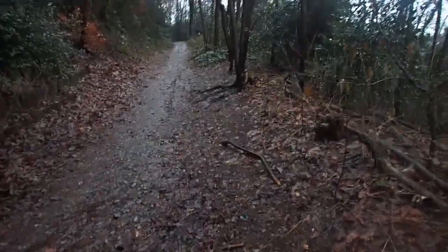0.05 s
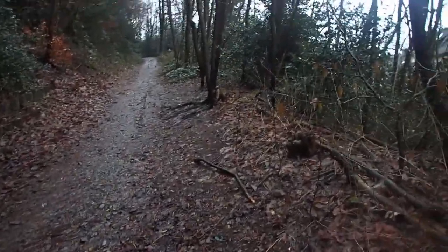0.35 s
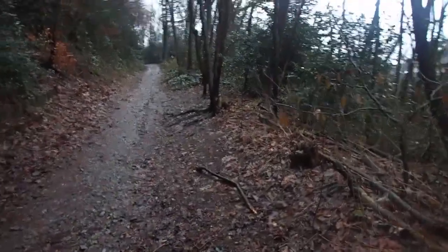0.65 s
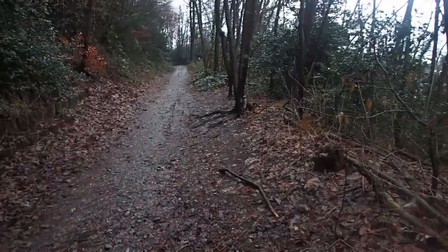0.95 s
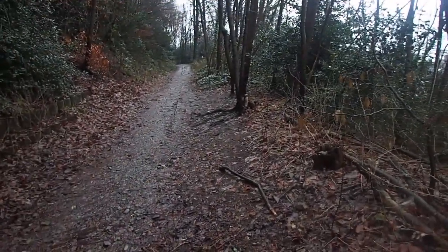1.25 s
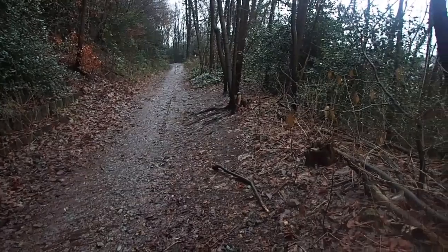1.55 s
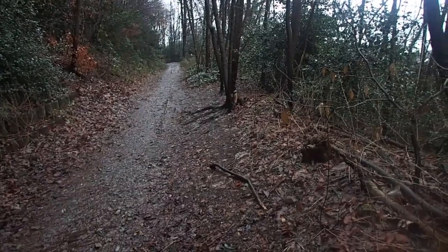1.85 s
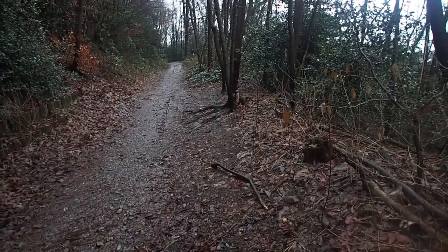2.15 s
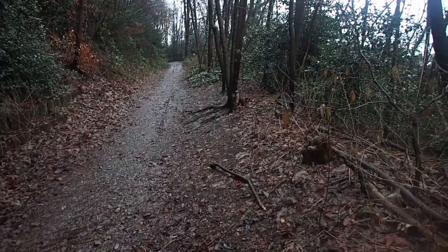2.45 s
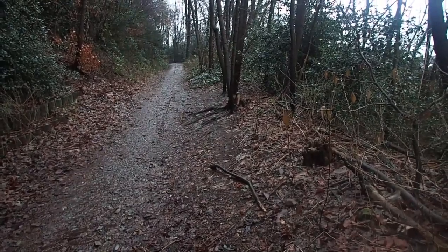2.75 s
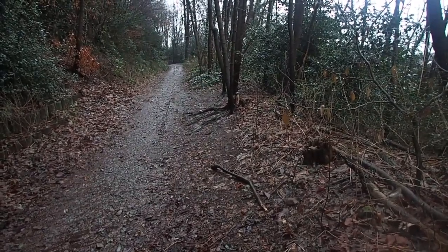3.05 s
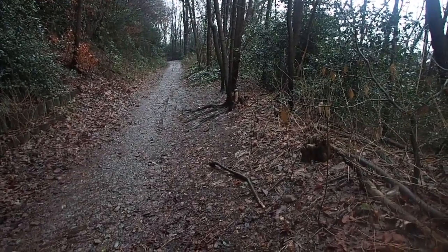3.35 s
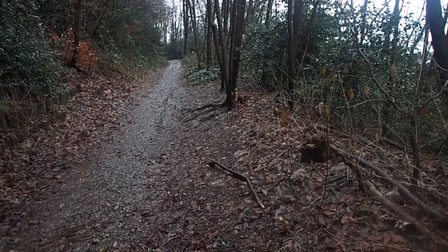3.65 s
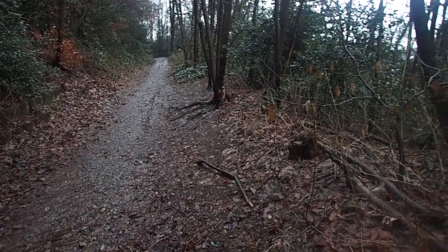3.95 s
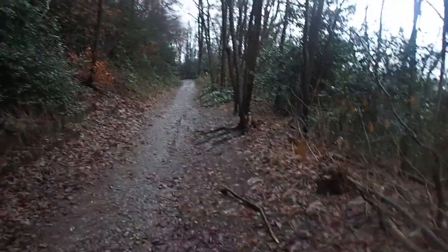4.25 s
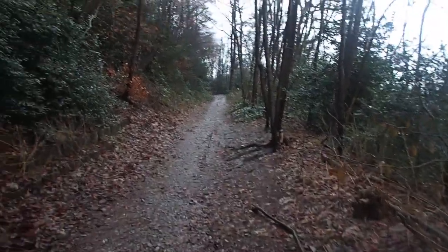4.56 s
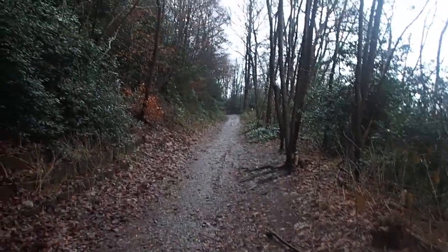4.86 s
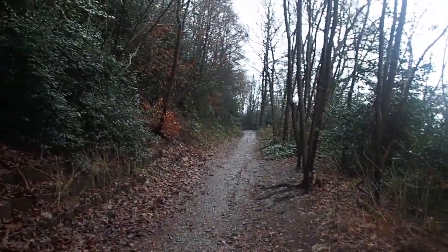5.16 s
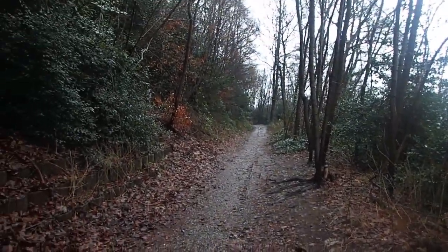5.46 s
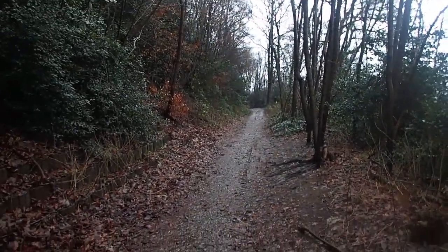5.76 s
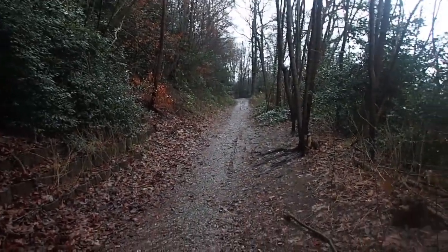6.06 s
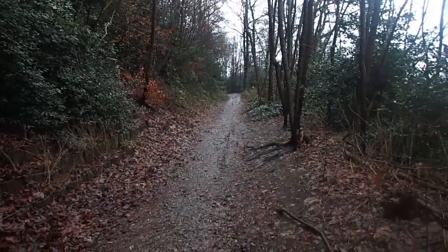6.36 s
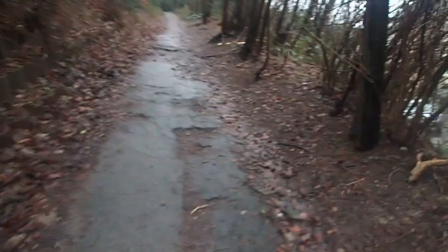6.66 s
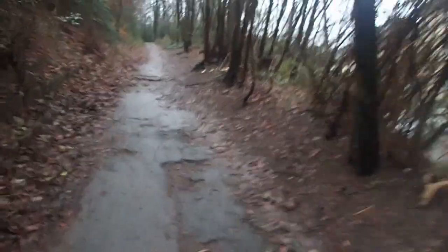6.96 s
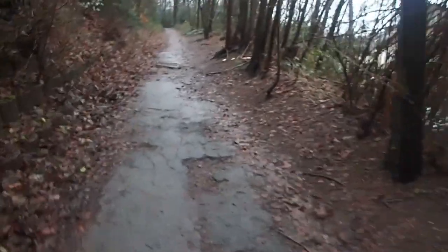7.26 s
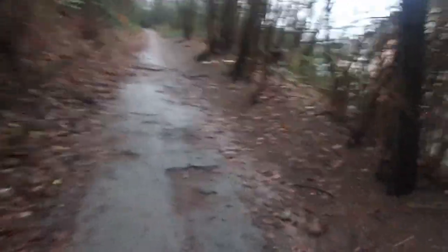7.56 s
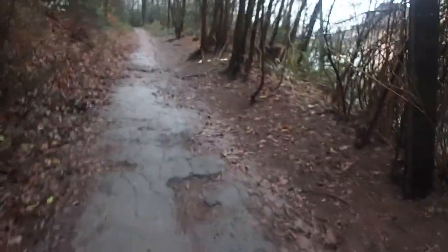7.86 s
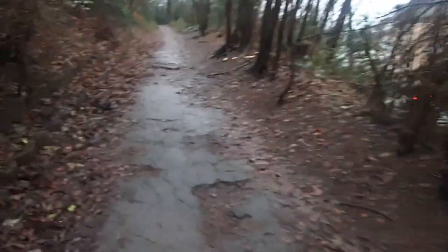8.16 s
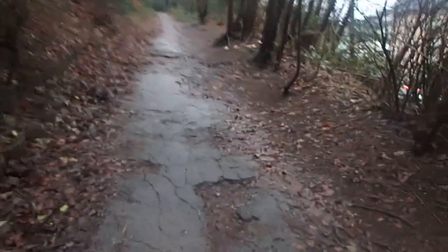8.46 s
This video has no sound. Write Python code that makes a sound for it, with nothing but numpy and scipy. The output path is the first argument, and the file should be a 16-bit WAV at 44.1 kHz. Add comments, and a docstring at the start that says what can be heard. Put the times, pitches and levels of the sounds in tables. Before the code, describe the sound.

Heard through a hand-held phone on a forest path, quiet rain patters on fallen leaves while single close drops land irregularly, one much louder than the rest. Cloth brushes past once. After a short dropout and a thump, a stronger wash of rain takes over, with a faint low hum sinking away, a few swishes of a sleeve and two more drops.

```python
"""Rain in a winter wood, heard through a hand-held phone whose two microphone ports resonate near 6 kHz.
At first fat drops strike nearby leaves and excite their bending modes, over patter, far wash and rumble.
A faint tone swells near 0.45 s, and at 1 s a sleeve brushes past. At 6.6 s the sound cuts out briefly;
it returns with a thump further down the path, where the wash is louder and something hums far off.
The hum sinks away while the sleeve brushes past again and two more fat drops land."""
import sys
import numpy as np
from scipy import signal
from scipy.fft import rfft, irfft, next_fast_len
from scipy.io import wavfile
from scipy.ndimage import uniform_filter1d, map_coordinates

SR = 44100
rng = np.random.default_rng(int(sys.argv[2]) if len(sys.argv) > 2 else 0)


def materialize(psi):
    """Save the field psi as 16-bit PCM at rate SR to the path in sys.argv[1].

    A 1-D psi becomes a single channel; in a 2-D psi each row is a channel.
    """
    bounded = np.clip(np.atleast_2d(psi).T, -1, 1)
    quanta = np.round(bounded * 32767).astype(np.int16)
    wavfile.write(sys.argv[1], SR, quanta)


N = 384552
BREAK_START_S, BREAK_END_S = 6.617, 6.777

# spectral shapes of the noise layers: (frequency [Hz], relative spectral density [dB])
RUMBLE_SPECTRUM = [(20, -32), (50, -9.5), (90, -7), (150, 0.5), (290, -2), (450, -7.5), (900, -7.5),
                   (3000, -52.5)]
FIRST_WASH_SPECTRUM = [(60, -16), (250, -6), (450, 0.5), (700, -3.5), (1050, 3), (1600, 2), (3000, -1.5),
                       (5000, -15.5), (16000, -27)]
SECOND_WASH_SPECTRUM = [(60, -46), (250, -7), (450, -3.5), (700, -2.5), (830, -2.5), (1080, 2.5),
                        (1300, -0.5), (1600, -1), (3000, -6.5), (5000, -21.5), (16000, -24)]
HISS_SPECTRUM = [(300, -59), (2500, -12), (5000, 0.5), (8000, -1), (11000, 1), (16000, -5.5)]
CLOTH_SPECTRUM = [(500, -31), (4500, -13), (6500, -5), (8000, -1.5), (10000, -2.5), (16000, -3.5)]
# likeness of left and right: (frequency [Hz], coherence [0-1])
COHERENCE = [(30, 0.65), (130, 0.98), (600, 0.9), (1400, 0.96), (3100, 1), (6800, 0.74), (10000, 0.4),
             (15000, .05)]
# low rumble of the surroundings: (time [s], level [dB])
RUMBLE_LEVELS = [(0, -58.5), (0.8, -56.5), (1.85, -57), (2.2, -59), (3.9, -61.5), (4.3, -60.5), (6.0, -59),
                 (6.6, -56), (6.8, -55), (8.15, -56.5), (8.7, -49)]
# steady rain before and after the break, ahead of trims: (time [s], wash level [dB], hiss level [dB])
FIRST_RAIN_LEVELS = [(0.0, -55, -50), (0.5, -53.5, -52.5), (0.79, -58, -51.5), (1.07, -58, -50),
                     (1.27, -52, -46), (1.57, -67, -50.5), (1.97, -55.5, -48), (2.45, -57, -52.5),
                     (2.82, -54.5, -49), (3.11, -57.5, -52), (3.33, -54, -49), (3.93, -57, -51.5),
                     (4.31, -53.5, -49), (4.79, -59, -51), (5.2, -54.5, -52), (5.63, -60, -49),
                     (5.95, -58, -53.5), (6.42, -52.5, -49.5)]
SECOND_RAIN_LEVELS = [(7.0, -41, -35.5), (7.212, -40.5, -35), (7.434, -40.5, -34.5), (7.658, -41, -39.5),
                      (7.86, -41.5, -40.5), (8.288, -41, -37.5), (8.7, -40.5, -35)]
# resonances of fallen leaves of different sizes: (frequency [Hz], relative gain [dB])
LITTER_MODES = [(5000, -11), (6200, -6), (7500, -4.5), (9300, 0)]
# strokes of the sleeve past the phone: (start [s], duration [s], level [dB])
SLEEVE_STROKES = [(1.04, 0.4, -41), (6.749, 0.16, -39.5), (7.452, 0.22, -36), (7.789, 0.35, -36),
                  (8.37, 0.38, -33.5)]
# big limp leaves thud, small stiff ones plink: (slap frequency [Hz], quality factor [1])
LEAF_Q = [(250, 1.5), (520, 0.73), (1000, 0.78), (1400, 0.85), (1750, 7.2)]
# the loudest near drops, ahead of trims:
# (time [s], slap level [dB], tick level [dB], slap frequency [Hz], tick frequency [Hz], spray [0-1])
FAT_DROPS = [(0.038, -47.5, -50.5, 1200, 6700, 0.6), (0.109, -55, -58, 380, 6550, .9),
             (0.291, -44, -40.5, 1120, 5330, 0.12), (0.482, -50, -52, 1120, 5700, 0.2),
             (0.508, -46, -55, 1210, 5450, 0), (0.642, -69, -39.5, 1240, 7400, 0.1),
             (0.675, -49.5, -63, 1220, 5900, .3), (1.032, -51.5, -55, 1210, 6400, 0.3),
             (1.179, -52, -52, 1670, 5000, .3), (1.296, -49, -43, 1190, 6470, .14),
             (1.389, -28, -26.5, 566, 6260, 0), (1.475, -43.5, -43.5, 800, 4960, 0.17),
             (1.616, -50.5, -60, 1220, 5900, 0.3), (1.687, -50.5, -52.5, 1290, 4670, 0),
             (1.949, -42.5, -52.5, 960, 6550, 0), (1.971, -57, -35.5, 1120, 10200, .8),
             (2.241, -59, -46.5, 670, 7050, 0.5), (2.532, -57, -51, 1230, 4300, .1),
             (2.738, -47, -54, 970, 5700, 0.2), (2.772, -52.5, -54.5, 1250, 5030, 0),
             (2.975, -45.5, -42.5, 1800, 6050, 0.3), (3.044, -52.5, -58, 1130, 6000, .3),
             (3.19, -47.5, -49, 980, 5260, 0.04), (3.248, -52, -66, 1010, 5270, .5),
             (3.322, -51, -51, 1190, 5430, 0.2), (3.381, -47.5, -54, 1160, 5400, 0),
             (3.423, -49, -56, 1230, 5540, .4), (3.516, -53, -47.5, 915, 6300, 1),
             (3.658, -48, -53, 1040, 5440, 0.1), (3.684, -49.5, -54, 1050, 5600, .4),
             (3.843, -67, -47.5, 880, 6100, .6), (3.915, -45, -44.5, 1350, 5700, 0.08),
             (4.015, -54, -47.5, 1370, 6300, 0), (4.145, -64, -44.5, 1000, 8100, .4),
             (4.278, -72, -44.5, 1140, 7350, 0.5), (4.434, -51, -47.5, 1190, 6500, 0),
             (4.441, -46, -53, 1290, 6100, 0), (4.613, -87, -31, 1300, 7400, 0.08),
             (4.795, -46, -50.5, 1250, 5970, 0.1), (5.033, -53, -50, 1180, 5800, 0),
             (5.15, -49, -47, 1390, 6660, .6), (5.48, -59, -49.5, 960, 6800, .5),
             (5.727, -56, -48, 1560, 6760, .6), (5.756, -56, -50.5, 1410, 6000, 0.2),
             (5.879, -50.5, -47.5, 1040, 6700, .9), (5.896, -46.5, -55, 1060, 5430, 0.4),
             (6.301, -53, -59, 1850, 6200, .2), (6.358, -53, -49.5, 1450, 5200, .2),
             (6.387, -53.5, -47.5, 1070, 4930, 0.2), (6.423, -42.5, -48, 1170, 5900, 0),
             (6.537, -47.5, -53, 1150, 5800, 0.2), (6.55, -50, -53, 1110, 6300, 0.3),
             (6.575, -59, -47, 1270, 5540, .15), (6.99, -55, -33, 1004, 7400, .4),
             (8.41, -49, -60, 220, 5950, .9)]
# response of both microphone ports, and what the right one adds: (frequency [Hz], gain [dB])
PORT_RESPONSE = [(20, 0), (150, -0.5), (1600, 0), (2100, -1.5), (2700, -9.5), (3100, -4.5), (4150, -6.5),
                 (4650, 0.5), (5400, 3), (6300, 7), (7300, 1.5), (8000, 3.5), (9000, -8.5), (11500, -17)]
RIGHT_PORT_EXTRA = [(60, 3.5), (300, 3.5), (3000, 3.5), (3900, 1), (4600, 3.5), (5400, 10), (6400, 0.2),
                    (12000, -1)]
# narrow bands absorbed by cavities in the case: (frequency [Hz], width [Hz], depth [dB])
CAVITY_NOTCHES = [(1880, 114, 13), (3336, 35, 22), (4036, 97, 13), (4860, 134, 12.5)]


def amp(db):
    """Amplitude ratio: a factor of ten for every 20 dB."""
    return 10 ** (np.asarray(db) / 20)


def unit(x):
    """Normalisation to rms 1."""
    return x / np.sqrt(np.mean(x ** 2) + 1e-20)


def along(points, hz):
    """Interpolation of (frequency [Hz], value) points on a logarithmic frequency axis."""
    knots_hz, values = np.transpose(points)
    return np.interp(np.log(hz + 1), np.log(knots_hz + 1), values)


def curves(rows):
    """Linear interpolation, sample by sample, of each column after the time."""
    times, *columns = np.transpose(rows)
    return [np.interp(np.arange(N) / SR, times, column) for column in columns]


def wobble(rate):
    """Random modulation: a spline through `rate` Gaussian knots a second."""
    knots = rng.standard_normal(int(N * rate / SR) + 4)
    return map_coordinates(knots, [np.arange(N) * rate / SR])


def filtered(x, response):
    """Linear filtering: the spectrum is multiplied by a frequency response."""
    size = next_fast_len(N + SR // 4)
    return irfft(rfft(x, size) * response(np.fft.rfftfreq(size, 1 / SR)), size)[..., :N]


def ring(x, hz, q):
    """Forced response of a damped resonator of quality factor q."""
    return signal.lfilter(*signal.iirpeak(hz, q, fs=SR), x)


def spread(pair, spectrum):
    """Partial coherence: two independent signals become coloured stereo, wider in the treble."""
    def response(hz):
        angle = np.arccos(np.clip(along(COHERENCE, hz), -1, 1)) / 2
        return amp(along(spectrum, hz)) * [np.cos(angle), np.sin(angle)]
    mid, side = filtered(pair, response)
    return unit(np.array([mid + side, mid - side]))


def rush(spectrum, patchy_db):
    """Modulated Gaussian noise: stereo, rms 1, its gain varying in patches of time and frequency."""
    cells = signal.stft(rng.standard_normal((2, N)), nperseg=512)[2]
    patches = uniform_filter1d(rng.standard_normal(cells.shape[1:]), size=7, axis=0)
    patches = unit(uniform_filter1d(patches, size=12, axis=1))
    pair = signal.istft(cells * amp(patchy_db * patches), nperseg=512)[1][:, :N]
    return spread(pair, spectrum)


def impacts(count, scatter_db):
    """Shot noise of rms 1: impulses at random moments, many small and few large."""
    when, size, sign = rng.random((count, 3)).T
    heights = amp(-scatter_db * np.log(size + 1 / 30)) * np.sign(sign - 0.5)
    return unit(np.bincount((when * N).astype(int), heights, N))


def ports(x, size=4096):
    """Port resonance and cavity absorption act as one minimum-phase filter on each channel."""
    hz = np.fft.rfftfreq(size, 1 / SR)
    loss_db = sum(depth / (1 + (2 * (hz - centre) / width) ** 2)
                  for centre, width, depth in CAVITY_NOTCHES)
    left_db = along(PORT_RESPONSE, hz) - loss_db
    right_db = left_db + along(RIGHT_PORT_EXTRA, hz)
    cepstrum = irfft(np.log(amp([left_db, right_db])))
    cepstrum[:, 1:size // 2] *= 2  # folding onto positive time makes the ringing causal
    cepstrum[:, size // 2 + 1:] = 0
    impulse_response = irfft(np.exp(rfft(cepstrum)))
    return signal.fftconvolve(x, impulse_response, axes=1)[:, :N]


def rumble():
    """Ambient noise: the surroundings give a low band whose level drifts slowly."""
    return amp(curves(RUMBLE_LEVELS)[0]) * rush(RUMBLE_SPECTRUM, patchy_db=2.0)


def far_hum(start_db=-58.5, sink_db_per_s=6, depth_db=3.5, period_s=0.94, crest_s=7.0):
    """Amplitude modulation: a low drone swells periodically as it decays, under a weak upper partial."""
    t = np.arange(N) / SR
    swell_db = depth_db * np.cos(2 * np.pi * (t - crest_s) / period_s)
    level_db = start_db - sink_db_per_s * np.maximum(t - BREAK_END_S, 0) + swell_db
    drone = amp(level_db) * np.sin(2 * np.pi * 66.5 * t + 0.34 * wobble(4))
    partial = amp(-65) * np.sin(2 * np.pi * 199.2 * t + 0.5 * wobble(5))
    return drone + partial


def far_tone(centre_s=0.45, half_s=0.17, hz=1275, fall_hz=40, db=-55, period_s=0.17, depth_db=3.5):
    """Amplitude and frequency modulation: a faint tone in the trees swells three times and sinks."""
    t = np.arange(N) / SR - centre_s
    u = t / half_s
    pitch_hz = hz - fall_hz * np.clip(u, -1, 1) / 2 + 34 * wobble(120)
    level_db = db + depth_db * np.cos(2 * np.pi * t / period_s) + 1.7 * wobble(29.6)
    return amp(level_db) * np.exp(-u ** 4) * np.sin(2 * np.pi * np.cumsum(pitch_hz) / SR)


def crackle():
    """Impulse excitation: fine drops set the leaf litter ringing, each leaf size at its own pitch."""
    pair = np.zeros((2, N))
    for hz, db in LITTER_MODES:
        hits = np.array([impacts(count=600, scatter_db=6) for _ in range(2)])
        pair += amp(db) * ring(hits, hz, q=6.3)
    return spread(pair, HISS_SPECTRUM)


def steady_rain(levels, wash_spectrum, wash_trim_db, hiss_trim_db, patter_db, crackle_db):
    """Incoherent summation: far drops merge into wash and hiss; nearer ones patter and crackle."""
    wash_db, hiss_db = curves(levels)
    hits = np.array([impacts(count=1100, scatter_db=6.5) for _ in range(2)])
    patter = amp(patter_db) * spread(hits, wash_spectrum)
    wash = unit(rush(wash_spectrum, patchy_db=1.0) + patter)
    flicker_db = 0.8 * wobble(22)
    hiss = unit(rush(HISS_SPECTRUM, patchy_db=2.0) + amp(crackle_db) * crackle())
    return amp(wash_db + wash_trim_db) * wash + amp(hiss_db + hiss_trim_db + flicker_db) * hiss


def sleeve(skew=1.24, sharpness=0.96):
    """Friction noise: cloth brushes past in bright strokes that gather speed and stop more quickly."""
    t = np.arange(N) / SR
    strokes = np.zeros(N)
    for start_s, length_s, db in SLEEVE_STROKES:
        progress = np.clip((t - start_s) / length_s, 0, 1)
        strokes += amp(db) * np.abs(np.sin(np.pi * progress ** skew)) ** sharpness
    cloth = rush(CLOTH_SPECTRUM, patchy_db=0.5)
    return strokes * amp(wobble(30)) * cloth


def thump(start_s, gain_db, time_constant_s=0.0012):
    """Switching transient: one low, damped pulse as a channel comes back on."""
    u = np.maximum(np.arange(N) / SR - start_s, 0) / time_constant_s
    return -amp(gain_db) * u * (1 - u / 2) * np.exp(-u)


def light_drops(count, flurry_db_per_db=0.7, spread_octaves=0.44):
    """Random arrivals: rows like FAT_DROPS, one per equal interval before the break, louder in flurries."""
    when, slap, tick, size, stiffness, wetness = rng.uniform(-1, 1, (count, 6)).T
    times = (np.arange(count) + (when + 1) / 2) * BREAK_START_S / count
    wash_db, hiss_db = [flurry_db_per_db * (level - level.mean())[(times * SR).astype(int)]
                        for level in curves(FIRST_RAIN_LEVELS)]
    slap_db = -60.5 + 6 * slap + wash_db
    tick_db = -55.5 + 4 * tick + hiss_db
    slap_hz = 1200 * 2 ** (spread_octaves * size)
    tick_hz = 6200 * 2 ** (spread_octaves * stiffness)
    return np.transpose([times, slap_db, tick_db, slap_hz, tick_hz, np.abs(wetness)])


def splash(t, wetness, touch_t60_s=0.004, spray_t60_s=0.035, echo_t60_s=0.065):
    """Exponential decay of three noise bursts: first touch, then spray and a faint echo from t = 0."""
    noise = rng.standard_normal((4, len(t)))
    touch = unit(noise[0] * amp(-60 * (t - t[0]) / touch_t60_s))
    spray = unit(noise[1] * (t >= 0) * amp(-60 * t / spray_t60_s))
    echo = unit(noise[2:] * (t >= 0) * amp(-60 * t / echo_t60_s))
    return amp(-17.5) * touch + np.sqrt(wetness + 0.033) * spray + amp(-18) * echo


def near_drops(drops, tick_trim_db=-0.5, slap_trim_db=1.0):
    """Impact excitation of damped modes: each drop gives a sharp tick and slaps a leaf into bending."""
    lead = SR // 450  # samples from first touch to blow
    t = (np.arange(SR // 20) - lead) / SR
    blow = -unit(1.0 * (t == 0))
    radiation = signal.butter(2, 190, "highpass", fs=SR)  # a leaf is too small to radiate deep bass
    out = np.zeros((2, N + SR))
    for time_s, slap_db, tick_db, slap_hz, tick_hz, wetness in drops:
        spatter = splash(t, wetness)
        # the tick is a bare crack plus a brief ring, of a new bandwidth on every leaf
        crack = blow + spatter
        tick_q = 1.48 * rng.uniform(0.32, 1.05)
        ringing = ring(ring(crack, tick_hz, tick_q), tick_hz, tick_q)
        tick = unit(unit(ringing) + amp(-8) * unit(crack))
        # the slap is the leaf's main bending mode plus a weaker overtone
        push = signal.lfilter(*radiation, blow + 0.5 * spatter)
        overtone = ring(push, rng.uniform(1600, 3080), q=7)
        slap = unit(ring(push, slap_hz, along(LEAF_Q, slap_hz)) + amp(-8) * overtone)
        drop = amp(tick_db + tick_trim_db) * tick + amp(slap_db + slap_trim_db) * slap
        start = max(round(time_s * SR) - lead, 0)
        out[:, start:start + len(t)] += drop
    return out[:, :N]


def scene():
    """Superposition of the sources at two places along the path, one after the other."""
    t = np.arange(N) / SR
    first = steady_rain(FIRST_RAIN_LEVELS, FIRST_WASH_SPECTRUM, wash_trim_db=1.5, hiss_trim_db=1.64,
                        patter_db=-3, crackle_db=-5) + far_tone()
    second = steady_rain(SECOND_RAIN_LEVELS, SECOND_WASH_SPECTRUM, wash_trim_db=0.8, hiss_trim_db=0.6,
                         patter_db=-23, crackle_db=-8) + far_hum()
    fade_in = np.clip((t - BREAK_END_S) / 0.017, 0, 1)
    background = np.where(t < BREAK_END_S, first, fade_in * second) + rumble()
    thumps = np.array([thump(BREAK_END_S, gain_db=-10.5), thump(6.784, gain_db=-12)])  # left, right
    return background + sleeve() + thumps + near_drops(FAT_DROPS) + near_drops(light_drops(count=60))


def record(dry):
    """Transduction in the phone: port resonance, electronic hiss, the break, clipping and band limit."""
    t = np.arange(N) / SR
    heard = ports(dry) + amp(-57) * rng.standard_normal((2, N))
    gate = np.where((t < BREAK_START_S) | (t > BREAK_END_S), 1, amp(-53))
    clipped = np.clip(heard * gate, -0.9, 0.9)
    return filtered(clipped, lambda hz: hz < 16000)


dry = scene()
out = record(dry)
materialize(out)
```